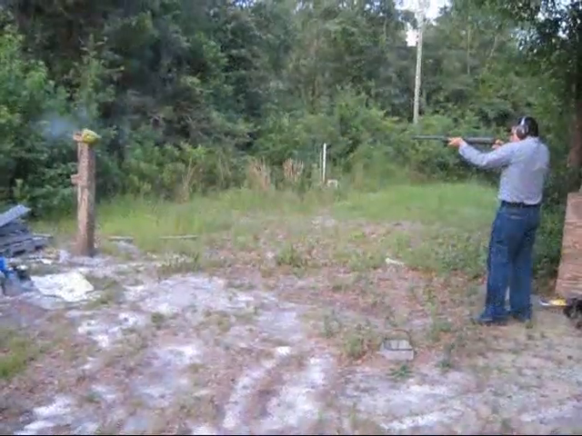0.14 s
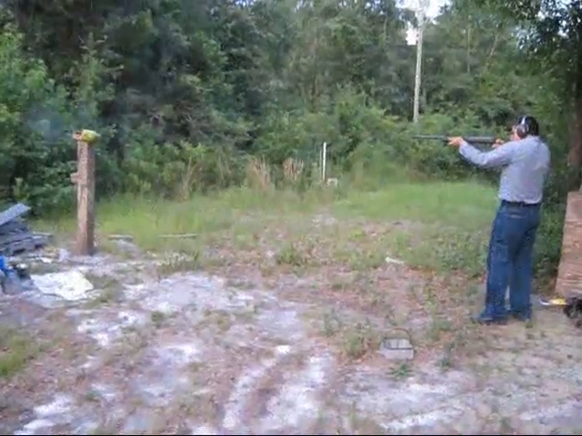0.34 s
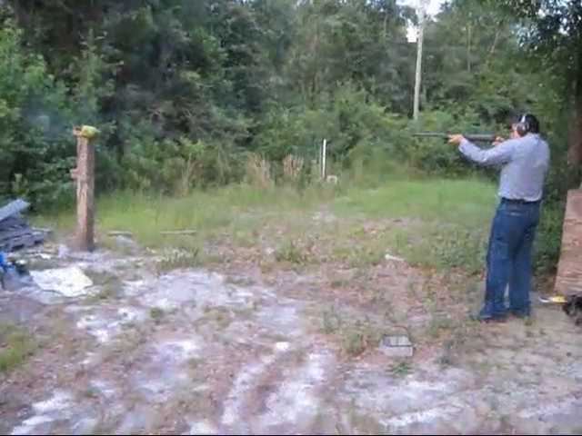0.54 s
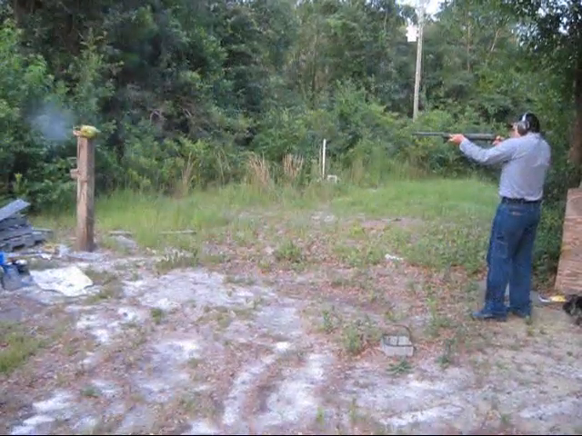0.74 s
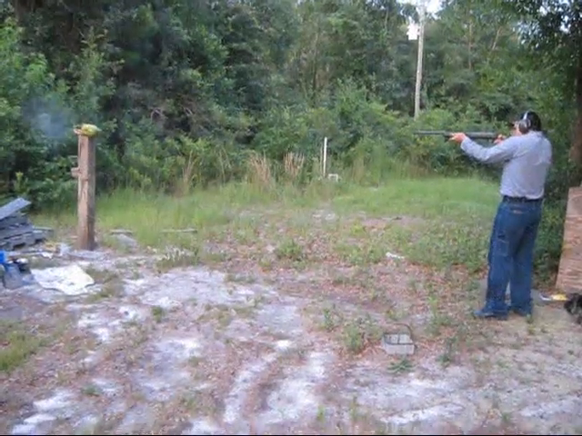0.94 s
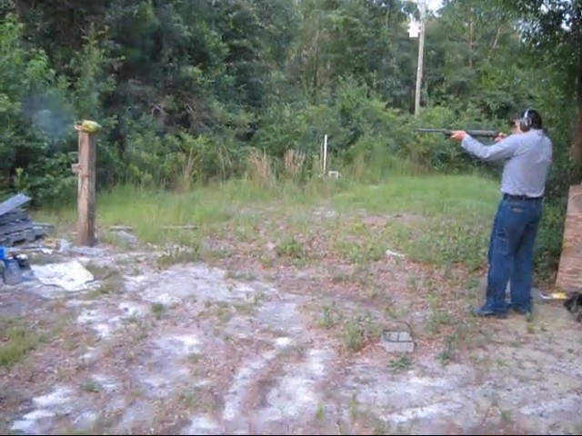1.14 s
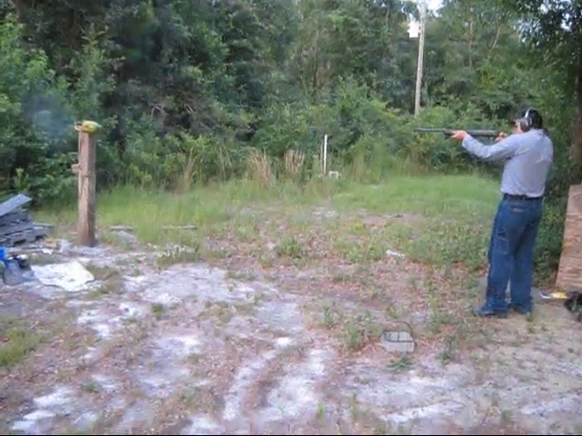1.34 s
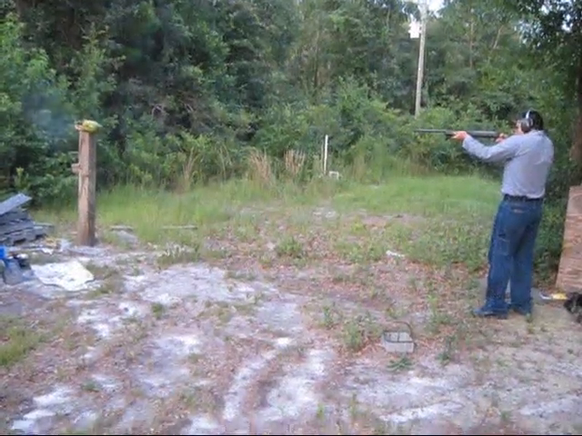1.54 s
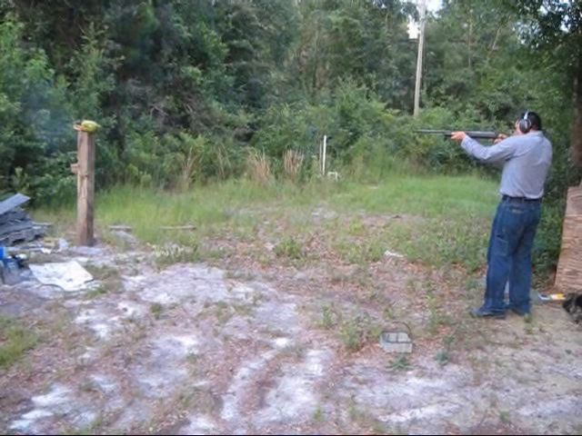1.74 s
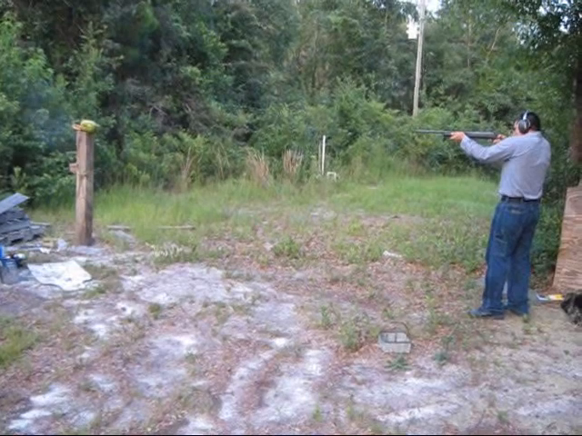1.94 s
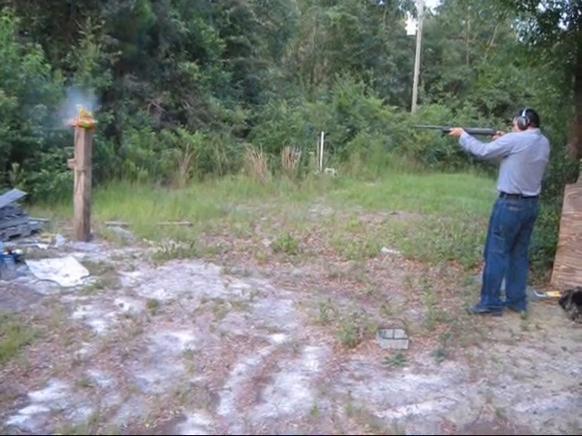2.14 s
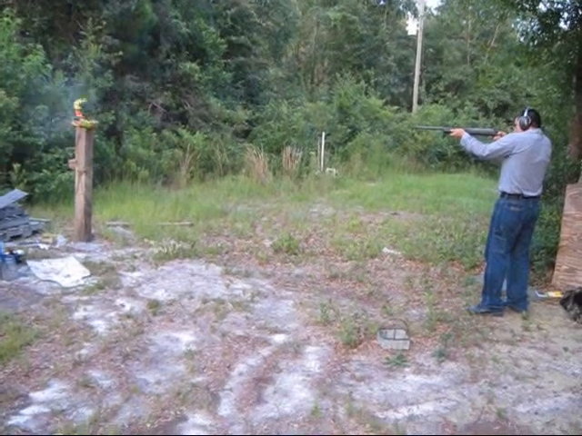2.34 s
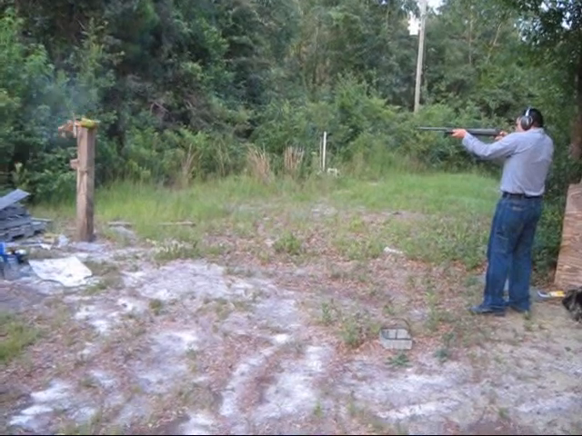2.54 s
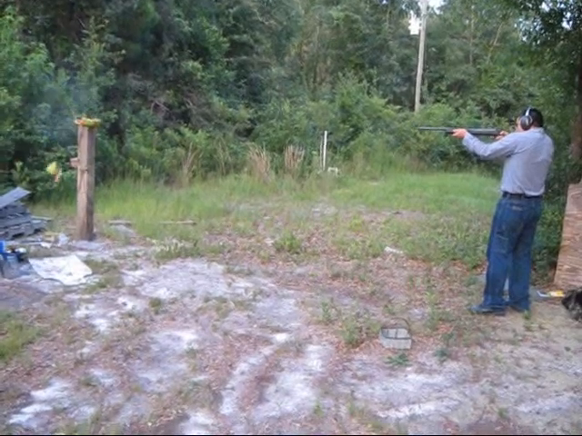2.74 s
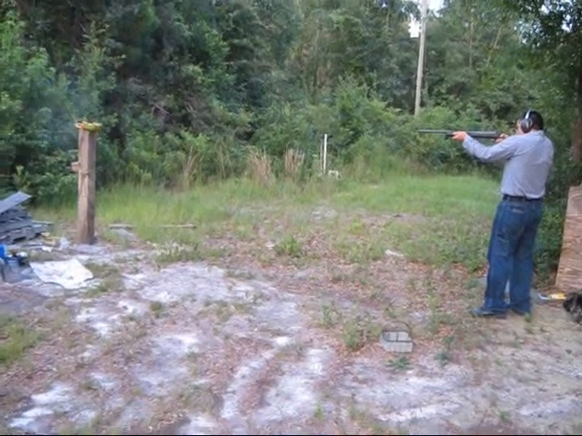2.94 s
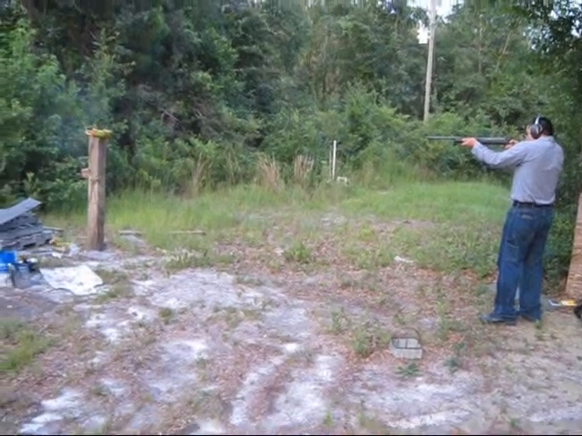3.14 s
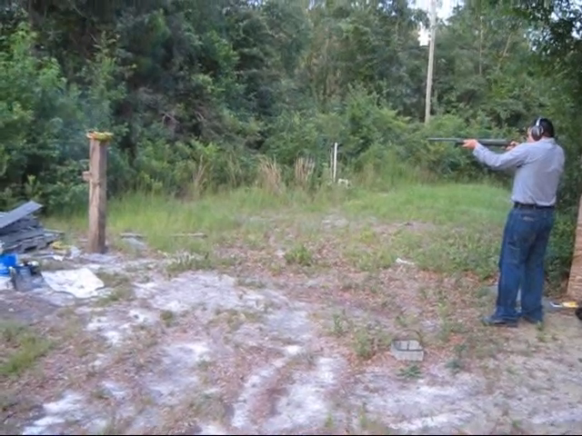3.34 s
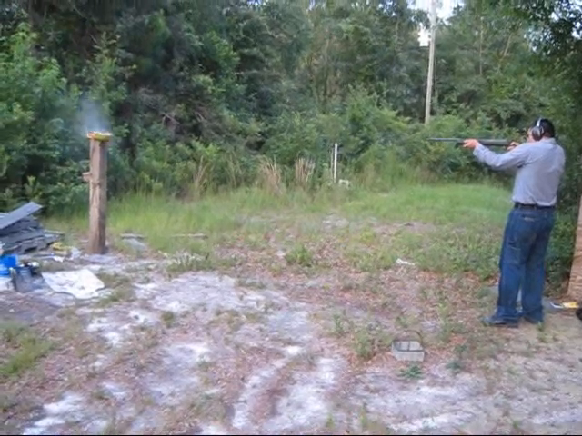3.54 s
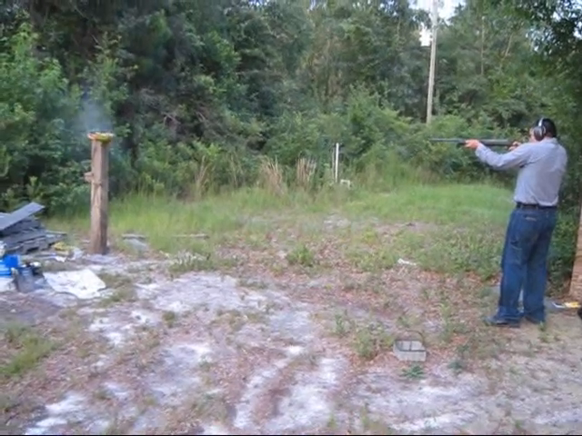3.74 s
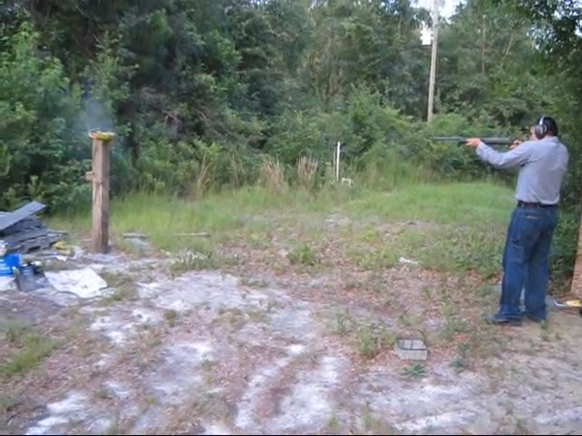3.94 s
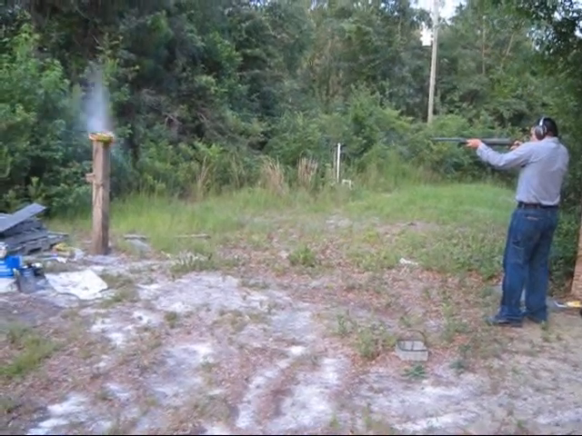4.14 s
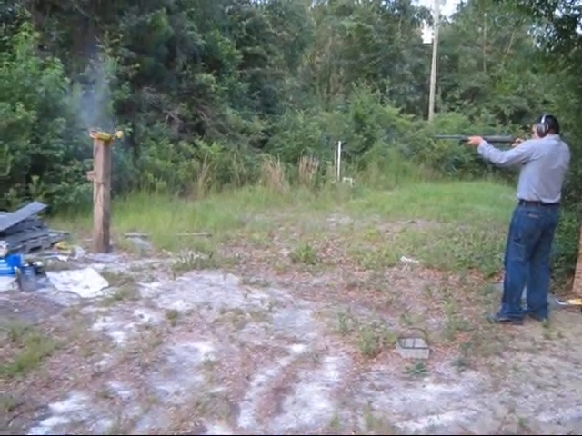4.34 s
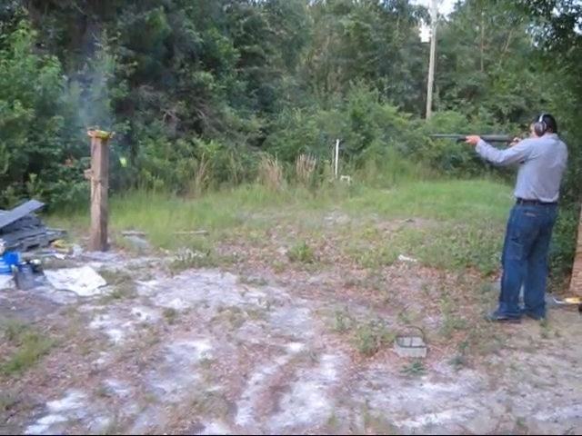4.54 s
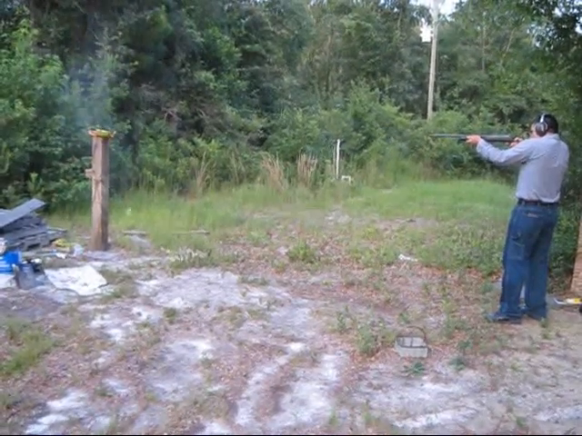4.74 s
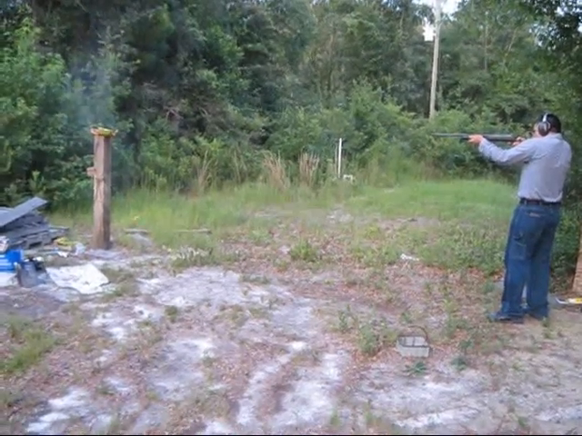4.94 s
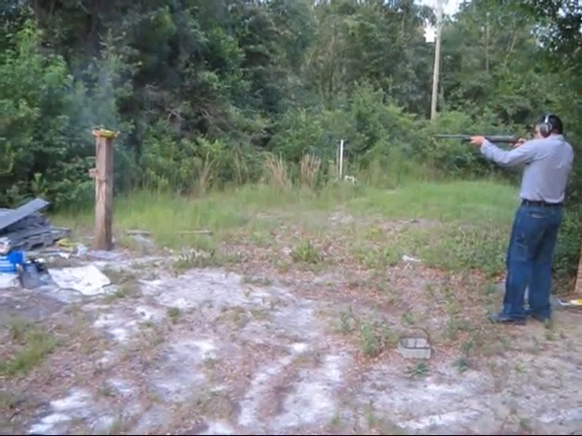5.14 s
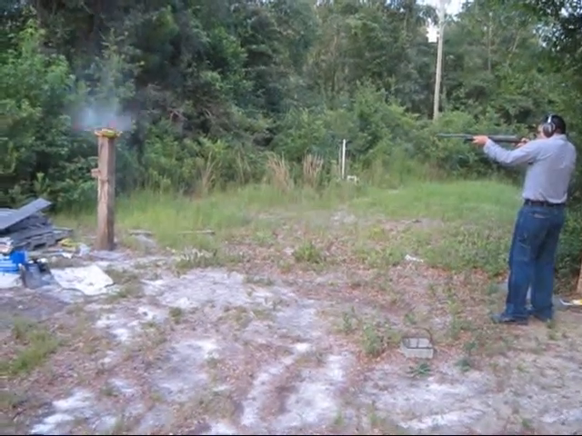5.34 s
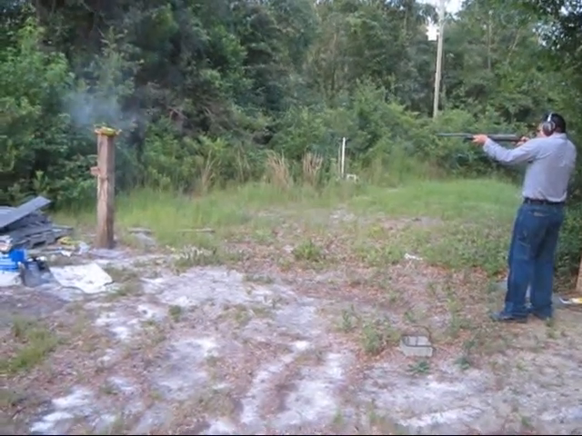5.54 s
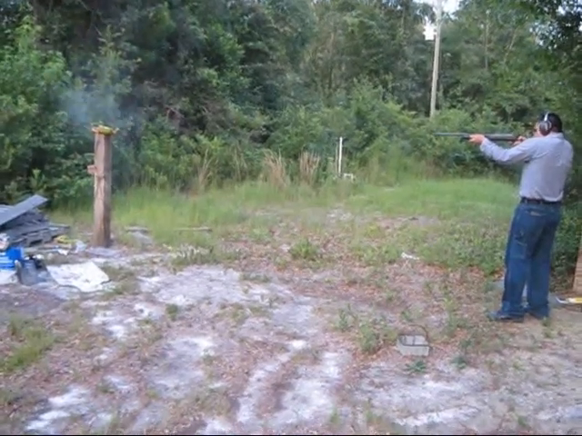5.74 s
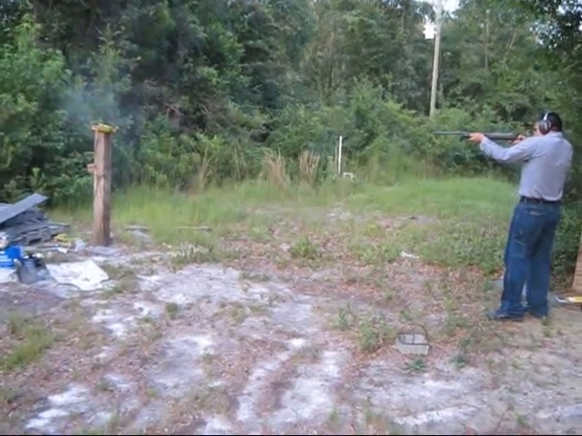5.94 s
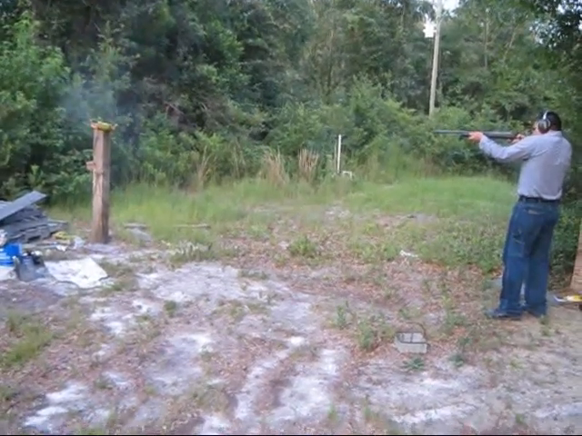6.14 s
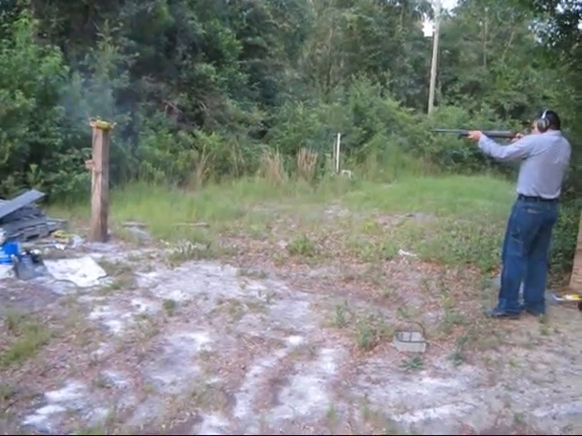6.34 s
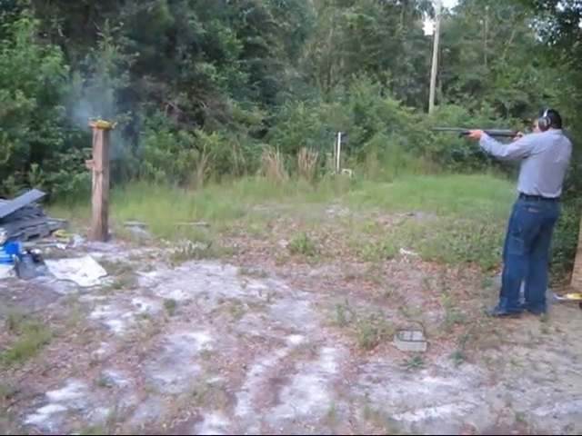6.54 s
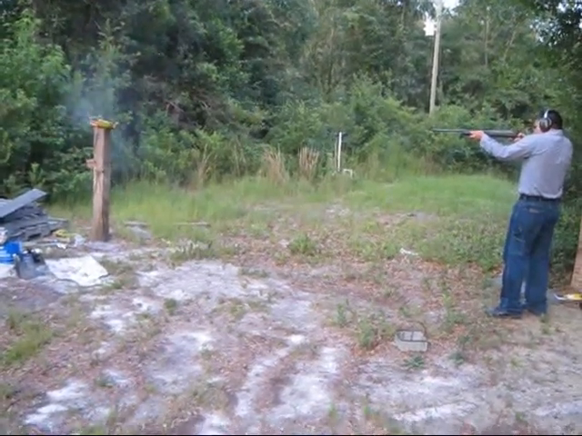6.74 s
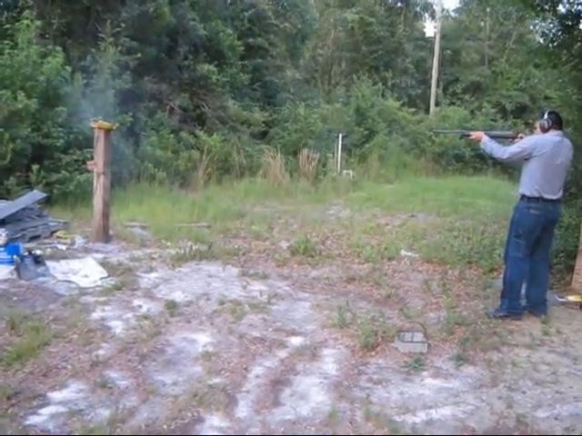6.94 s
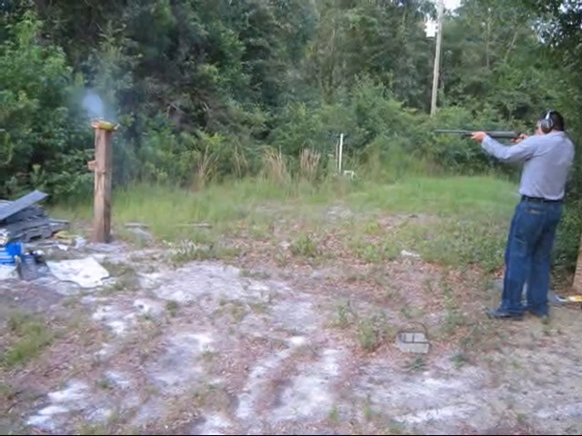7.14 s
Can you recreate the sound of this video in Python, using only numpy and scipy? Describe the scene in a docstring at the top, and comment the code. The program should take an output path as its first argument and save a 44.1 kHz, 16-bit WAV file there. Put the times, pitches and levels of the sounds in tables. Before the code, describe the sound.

Sharp cracks from a small-calibre rifle come at an uneven pace outdoors, each followed by a bright slap and a long echo from the forest. Some shots carry a short hollow knock as the bullet hits. Midway there is a close clack and bits of the target land; late on, a faint ricochet sings past. High insect buzz and echoes swell between shots as the lo-fi microphone recovers its level.

```python
"""A yard ringed by forest: insects buzz in the brush, a small rifle fires a string of shots.
Each shot is a crack, a blast, slaps from the yard and tree line, and a long roll from the woods.
Bullets knock on a target and a post, one strays, one ricochets; fragments whirr, tick and land.
A pocket camera ducks its gain at every shot, lets it swell back, and stores at a low sample rate."""
import sys
import numpy as np
from scipy import signal
from scipy.fft import rfft, irfft
from scipy.io import wavfile

SR = 44100
rng = np.random.default_rng(int(sys.argv[2]) if len(sys.argv) > 2 else 0)


def store_wav(level_fs):
    """Save 16-bit WAV to argv[1]."""
    pcm = np.round(np.clip(np.atleast_2d(level_fs), -1, 1) * 32767)
    wavfile.write(sys.argv[1], SR, pcm.T.astype(np.int16))


N = 317520
T = np.arange(N) / SR

# noise spectra: f/Hz, relative density/dB
AIR_SPECTRUM = [(20, -4), (60, -2), (150, -6), (300, -5.5), (450, 1), (700, 10), (1100, -1), (2200, -0.5),
                (3200, -6), (5300, -0.5)]
TICK_SPECTRUM = [(100, -22), (700, -14), (2000, -6), (3500, 0), (5300, -1)]
CLACK_SPECTRUM = [(100, -5), (700, -2), (1300, -1), (1950, -1), (2800, -5), (3750, 8), (4500, -2),
                  (5300, 5)]
DEEP_WOODS_SPECTRUM = [(200, -30), (400, -10), (700, 1.5), (1100, 3.5), (2300, -5), (3300, -18),
                       (5300, -17.5)]
YARD_SPECTRUM = [(40, -9.5), (150, -12.5), (400, -12.5), (700, -6), (1200, -5.5), (2000, -2.5), (3000, 1.5),
                 (4200, 1.5), (5300, -0.5)]
CRACK_SPECTRUM = [(40, -27), (200, -12), (500, -0.5), (1000, -6), (2000, -1), (3500, -5), (5300, -2)]
BLAST_SPECTRUM = [(40, -5), (150, -7), (350, -6), (800, -6), (1200, -3), (2300, 0), (3500, -7.5),
                  (5300, -1.5)]
# insect resonances: f/Hz, half-width/Hz, level/dB, chorus index
INSECT_VOICES = [(4515, 610, -1.5, 0), (4940, 210, 1, 1), (4500, 55, -6, 1), (2490, 120, -1.5, 1)]
# bouts of buzzing: t/s, length/s, level/dB, chorus index
INSECT_BOUTS = [(1.45, 1.24, -59, 0), (1.49, 2.6, -69, 1), (2.399, 1.8, -58, 0), (4.5, 1.7, -59.5, 0),
                (5.6, 2.3, -60, 1), (5.698, 2.2, -62.5, 0)]
# debris and gun handling: t/s, level/dB
TICK_EVENTS = [(1.8891, -18), (3.045, -25), (3.1433, -28), (4.1029, -19.5), (4.75, -21), (4.9151, -22.5),
               (4.997, -21.5), (5.0749, -23), (6.957, -15.5)]
# target pieces landing: t/s, level/dB
PIECE_LANDINGS = [(3.0195, 3), (4.9157, -3)]
# tumbling fragments: t/s, length/s, first f/Hz, last f/Hz, level/dB
FRAGMENT_FLIGHTS = [(4.66, 0.29, 295, 197, -65.5), (6.12, 0.356, 270.5, 185, -73)]
# bullet strikes: t/s, level/dB
POST_STRIKES = [(4.235, -22), (5.405, -25), (6.535, -27)]
TARGET_STRIKES = [(.2037, -19), (.75, -11.5), (2.2355, -6.5), (4.2335, -12.5)]
# hollow target modes: f/Hz, level/dB, t60/s
TARGET_MODES = [(646, 1.5, 0.029), (760, 0, 0.033), (1394, -8, 0.027)]
# roll from the woods: f/Hz, density/dB, t60/s, swell/s
FOREST_ROLL = [(100, -65, 0.87, 0.052), (325, -65, 1.9, 0.13), (486, -53, 2.7, 0.38),
               (727, -38, 2.65, 0.32), (1070, -41.5, 2.4, 0.09), (1830, -39.5, 2.24, 0.038),
               (2300, -39, 2.08, 0.071), (3260, -44.5, 1.79, 0.01), (4800, -40, 0.93, 0.013)]
# yard and tree line echoes: delay/s, rise/s, t60/s, level/dB
YARD_ECHOES = [(.005, 0.0055, .16, -21.5), (.0135, 0.0011, 0.018, -12.5), (.016, 0.016, .23, -15.5),
               (.0585, .001, .022, -12.5), (.06, .003, 0.38, -20)]
# shots: t/s, blast trim/dB, pressure wave/dB, forest trim/dB
RIFLE_SHOTS = [(-.42, 0, -20, -1.5), (0.1872, 1.5, -27, -1), (.7335, 2.5, -27, 0.5), (1.2525, 1, -29, 7.5),
               (2.219, 0.5, -19, -1.5), (3.5745, 3, -25, 0.5), (4.217, 5.5, -18, 0.5),
               (5.3872, 2.5, -14, 1), (6.5168, 4.5, -20, 1), (7.19, 1, -27, -5)]


def from_db(db):
    return 10 ** (np.asarray(db) / 20)


def unit_rms(x):
    return x / np.sqrt(np.mean(x ** 2) + 1e-20)


def at_hz(rows, hz):
    """Table columns interpolated over log frequency."""
    points_hz, *columns = np.transpose(rows)
    return [np.interp(np.log(hz + 1e-9), np.log(points_hz), c) for c in columns]


def add(out, at_s, sound):
    """Mix in at at_s, which may be negative."""
    start = round(at_s * SR)
    part = sound[max(-start, 0):max(N - start, 0)]
    out[max(start, 0):max(start, 0) + len(part)] += part


def noise(spectrum, size, top_hz=6500):
    """Coloured noise, rms 1."""
    hz = np.fft.rfftfreq(size, 1 / SR)
    gain = from_db(at_hz(spectrum, hz)[0]) * (hz < top_hz)
    return unit_rms(irfft(rfft(rng.standard_normal(size)) * gain, size))


def band(low_hz, high_hz, size):
    """Band noise, rms 1."""
    sos = signal.butter(2, [low_hz, high_hz], "band", fs=SR, output="sos")
    return unit_rms(signal.sosfilt(sos, signal.sosfilt(sos, rng.standard_normal(size))))


def drift(rate_hz):
    """Random wander between unit-variance knots."""
    knots = rng.standard_normal(4096)
    return np.interp(T * rate_hz, np.arange(len(knots)), knots)


def burst(t, rise_s, t60_s):
    """Quadratic rise to 1, exponential decay."""
    return np.clip(t / rise_s, 0, 1) ** 2 * from_db(-60 * np.maximum(t - rise_s, 0) / t60_s)


def air(level_db=-53.5, waver_db=1.0):
    """Faint outdoor noise, wavering in level."""
    return from_db(level_db + waver_db * drift(9.1)) * noise(AIR_SPECTRUM, N)


def insects(throb_db=0.5, swell_s=0.47, fade_s=0.5):
    """Two choruses buzz in narrow resonances; each bout swells, holds and fades."""
    envelopes = np.zeros((2, N))
    for at_s, length_s, level_db, chorus in INSECT_BOUTS:
        swell = np.clip((T - at_s) / swell_s, 0, 1)
        fade = np.clip((at_s + length_s - T) / fade_s, 0, 1)
        envelopes[round(chorus)] += from_db(level_db) * swell * fade
    voices = sum(band(hz - half_hz, hz + half_hz, N) * from_db(db) * envelopes[round(chorus)]
                 for hz, half_hz, db, chorus in INSECT_VOICES)
    return voices * from_db(throb_db * drift(60))


def ticks(gain_db=-17):
    """Light, dry ticks of debris and gun handling."""
    out, t = np.zeros(N), T[:SR // 8]
    for at_s, level_db in TICK_EVENTS:
        tick = np.tanh(noise(TICK_SPECTRUM, len(t))) * burst(t, rise_s=0.00054, t60_s=0.035)
        add(out, at_s, from_db(level_db + gain_db) * tick)
    return out


def clack(at_s=2.8229, peak_db=-24, tail_db=-14.5, knock_db=-43):
    """One sharp, close clack over a low knock."""
    out, t = np.zeros(N), T[:SR // 8]
    tail = from_db(tail_db) * burst(t, rise_s=0.0025, t60_s=0.1)
    snap = np.tanh(noise(CLACK_SPECTRUM, len(t))) * (burst(t, rise_s=0.00045, t60_s=0.016) + tail)
    knock = band(60, 480, len(t)) * burst(t, rise_s=0.0016, t60_s=0.036)
    add(out, at_s, from_db(peak_db) * snap / np.abs(snap).max() + from_db(knock_db) * knock)
    return out


def landings(plop_db=-39, thud_db=-55):
    """Target pieces plop to the ground."""
    out, t = np.zeros(N), T[:SR // 8]
    for at_s, level_db in PIECE_LANDINGS:
        plop = from_db(plop_db) * np.tanh(band(490, 2400, len(t))) * burst(t, rise_s=0.0015, t60_s=0.035)
        thud = from_db(thud_db) * band(127, 270, len(t)) * burst(t, rise_s=0.003, t60_s=0.13)
        add(out, at_s, from_db(level_db) * (plop + thud))
    return out


def whirrs(wobble=0.035):
    """Each fragment hums at its spin rate, which sinks in flight."""
    out = np.zeros(N)
    for at_s, length_s, first_hz, last_hz, level_db in FRAGMENT_FLIGHTS:
        size = int(length_s * SR)
        hz = np.geomspace(first_hz, last_hz, size) * (1 + wobble * drift(81)[:size])
        add(out, at_s, from_db(level_db) * np.hanning(size) * np.sin(2 * np.pi * np.cumsum(hz) / SR))
    return out


def ricochet(at_s=5.8, length_s=0.98, first_hz=1800, last_hz=1530, wobble_hz=45,
             level_db=-58, flutter_db=2.7):
    """A tumbling bullet sings past, falling in pitch as it slows."""
    out, size = np.zeros(N), int(length_s * SR)
    hz = np.geomspace(first_hz, last_hz, size) + wobble_hz * drift(150)[:size]
    envelope = from_db(level_db + flutter_db * drift(44)[:size]) * np.hanning(size)
    add(out, at_s, envelope * np.sin(2 * np.pi * np.cumsum(hz) / SR))
    return out


def stray_bullet(at_s=1.27, trail_db=-19.5, rush_db=-22, deep_db=-41):
    """One bullet drags its crack through the brush and into the deep woods."""
    out, t = np.zeros(N), T[:SR // 2]
    trail = from_db(trail_db) * noise(BLAST_SPECTRUM, len(t)) * burst(t, rise_s=0.045, t60_s=0.3)
    rush = from_db(rush_db) * band(1400, 3400, len(t)) * burst(t, rise_s=0.052, t60_s=0.37)
    add(out, at_s, trail + rush)
    add(out, at_s, from_db(deep_db) * deep_woods(2 * SR))
    return out


def post(low_hz=290, high_hz=410):
    """Bullets strike a wooden post: short, dull thocks."""
    out, t = np.zeros(N), T[:SR // 4]
    for at_s, level_db in POST_STRIKES:
        thock = band(low_hz, high_hz, len(t)) * burst(t, rise_s=0.003, t60_s=0.047)
        add(out, at_s, from_db(level_db) * thock)
    return out


def target(rise_s=0.0035):
    """Each hit rings the same hollow modes."""
    out, t = np.zeros(N), T[:SR // 4]
    knock = sum(from_db(db) * np.sin(2 * np.pi * hz * t) * burst(t, rise_s, t60_s)
                for hz, db, t60_s in TARGET_MODES)
    for at_s, level_db in TARGET_STRIKES:
        add(out, at_s, from_db(level_db) * knock)
    return out


def deep_woods(size, delay_s=0.2, rise_s=0.29, t60_s=4.6):
    """Late second swell from far among the trees."""
    return noise(DEEP_WOODS_SPECTRUM, size) * burst(T[:size] - delay_s, rise_s, t60_s)


def forest_roll(size, ref_width_hz=400):
    """Trunks scatter the shot; the low mids swell later and outlast the treble."""
    edges_hz = np.geomspace(70, 6400, 20)
    out, t = np.zeros(size), T[:size]
    for low_hz, high_hz in zip(edges_hz, edges_hz[1:]):
        level_db, t60_s, swell_s = at_hz(FOREST_ROLL, np.sqrt(low_hz * high_hz))
        envelope = (1 - np.exp(-(t / swell_s) ** 2)) * from_db(level_db - 60 * t / t60_s)
        out += band(low_hz, high_hz, size) * envelope * np.sqrt((high_hz - low_hz) / ref_width_hz)
    return out


def tree_slap(t, delay_s=0.058):
    """The wall of trees throws back a narrow, bright slap."""
    return band(1760, 3400, len(t)) * burst(t - delay_s, rise_s=0.0016, t60_s=0.22)


def yard_echoes(t):
    """Reflections sum in power; same pattern for every shot."""
    power = sum((from_db(db) * burst(t - delay_s, rise_s, t60_s)) ** 2
                for delay_s, rise_s, t60_s, db in YARD_ECHOES)
    return np.sqrt(power) * noise(YARD_SPECTRUM, len(t))


def pressure_wave(t, centre_s=0.0054, width_s=0.00099):
    """Overpressure, then suction; peak 1."""
    u = (t - centre_s) / width_s
    return -u * np.exp((1 - u ** 2) / 2)


def rifle(crack_db=-12, blast_db=-11, blast_delay_s=0.0151, yard_db=-1, slap_db=-20.5, deep_db=-56,
          clump_db=1.53, grain_db=0.97):
    """Per shot: crack and pressure wave, blast, near echoes, roll from the woods."""
    out, t, roll_size = np.zeros(N), T[:SR * 3 // 4], 2 * SR
    # echo level ripple, shared by all shots
    clumps = from_db(clump_db * drift(69.57))[:roll_size]
    grain = from_db(grain_db * drift(400))[:len(t)]
    for at_s, trim_db, wave_db, forest_db in RIFLE_SHOTS:
        crack = from_db(crack_db) * noise(CRACK_SPECTRUM, len(t)) * burst(t, rise_s=0.0046, t60_s=0.015)
        wave = from_db(wave_db) * pressure_wave(t)
        blast = noise(BLAST_SPECTRUM, len(t)) * burst(t - blast_delay_s, rise_s=0.0037, t60_s=0.051)
        echoes = from_db(yard_db) * grain * yard_echoes(t) + from_db(slap_db) * tree_slap(t)
        add(out, at_s, crack + wave + from_db(blast_db + trim_db) * blast + echoes)
        roll = from_db(forest_db) * clumps * forest_roll(roll_size)
        add(out, at_s, roll + from_db(deep_db) * deep_woods(roll_size))
    return out


def scene():
    """Mono mix on both channels."""
    background = air()
    bullets = target() + post() + stray_bullet() + ricochet()
    debris = whirrs() + landings() + ticks() + clack()
    return np.tile(rifle() + bullets + debris + insects() + background, (2, 1))


def gain_control(x, limit_db=-16, range_db=26, release_s=0.62, attack_s=0.00039):
    """Peaks pull the gain down; it creeps back, lifting the roll and the insects."""
    level_db = 20 * np.log10(np.abs(x) + 1e-9)
    cut_db = np.clip(level_db + range_db - limit_db, 1e-3, range_db)
    cut_db[0] = range_db * 0.48   # gain starts part way up
    # peak hold, exponential release
    held_db = np.exp(np.maximum.accumulate(np.log(cut_db) + T / release_s) - T / release_s)
    pole = np.exp(-1 / (attack_s * SR))
    smooth_db, _ = signal.lfilter([1 - pole], [1, -pole], held_db, zi=held_db[:1])
    return x * from_db(range_db - smooth_db)


def record(dry, ceiling=0.42, dc_offset=-0.006, hold_samples=4, antialias_hz=5550, cutoff_hz=15700):
    """Camera: gain control, decimation, overload; sample hold mirrors the sound into the treble."""
    antialias = signal.firwin(97, antialias_hz, fs=SR)
    stored = signal.resample_poly(gain_control(dry[0]), 1, hold_samples, window=antialias)
    clipped = ceiling * np.tanh(stored / ceiling) + dc_offset
    stepped = np.repeat(clipped, hold_samples)[:N]
    lowpass = signal.ellip(12, 0.1, 80, cutoff_hz, fs=SR, output="sos")
    return np.tile(signal.sosfilt(lowpass, stepped), (2, 1))


dry = scene()
out = record(dry)
store_wav(out)
```